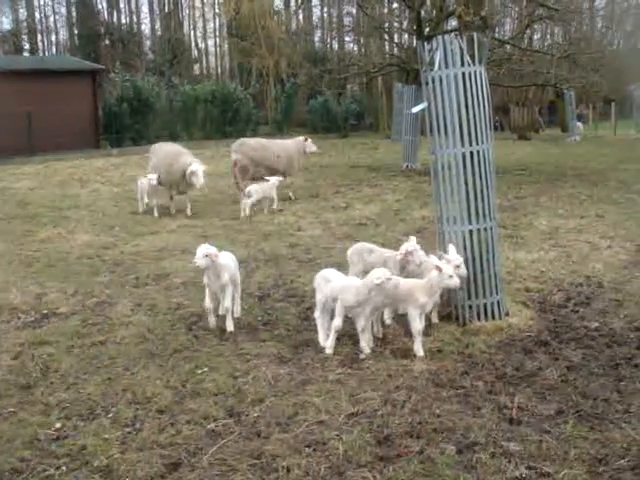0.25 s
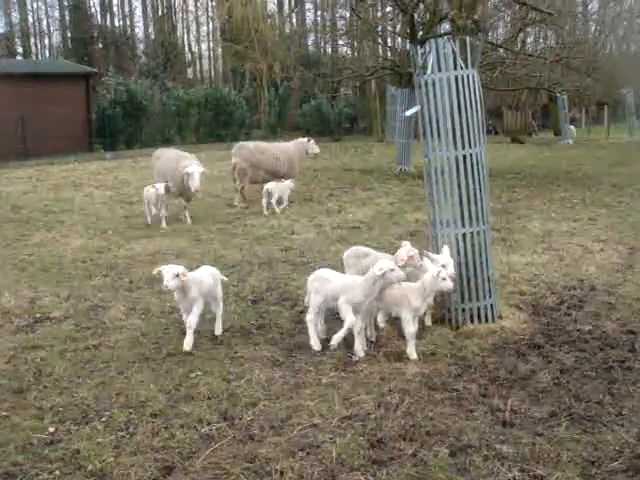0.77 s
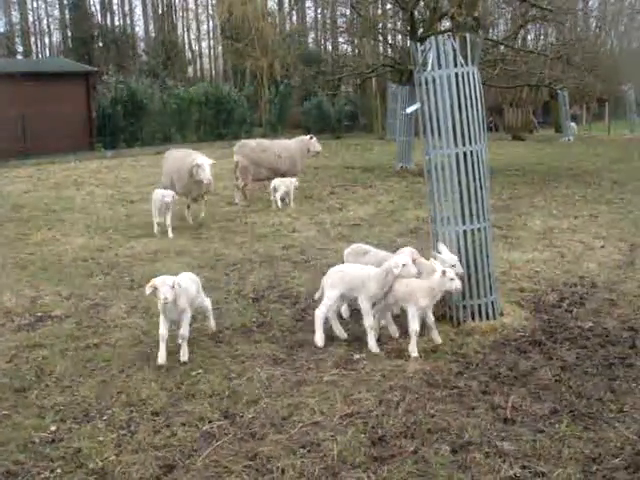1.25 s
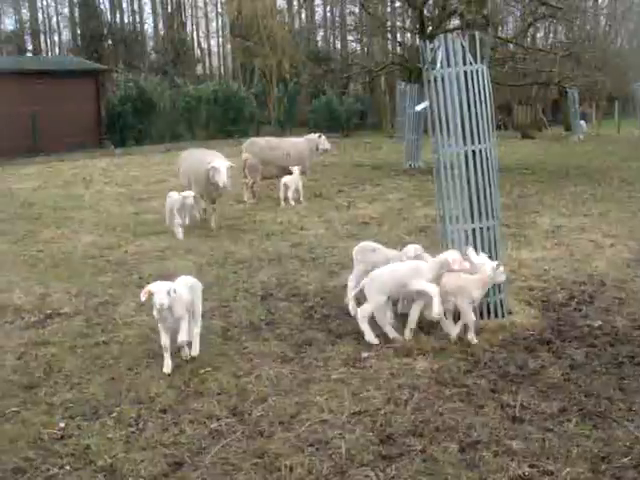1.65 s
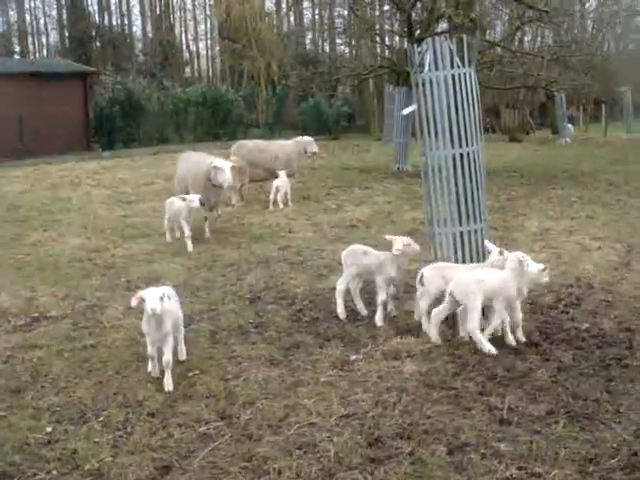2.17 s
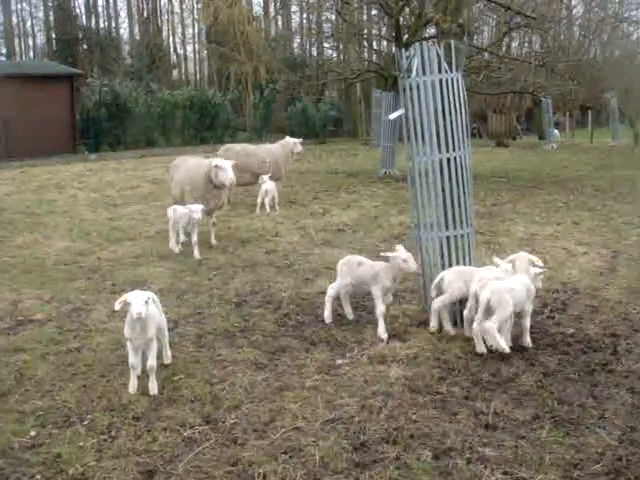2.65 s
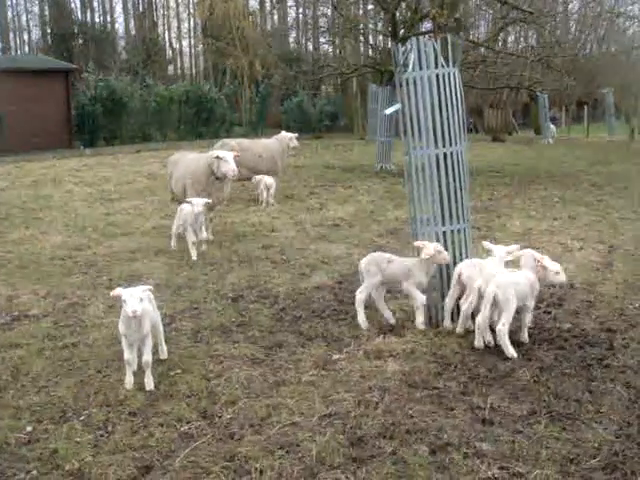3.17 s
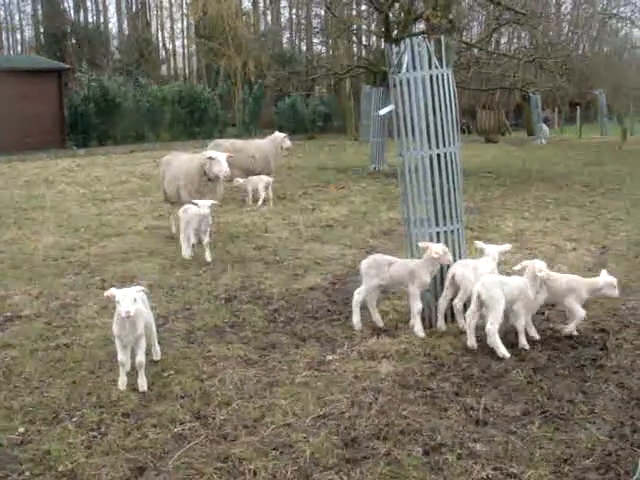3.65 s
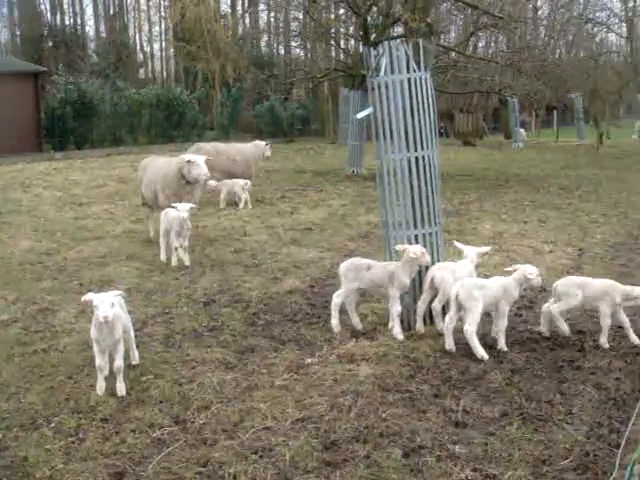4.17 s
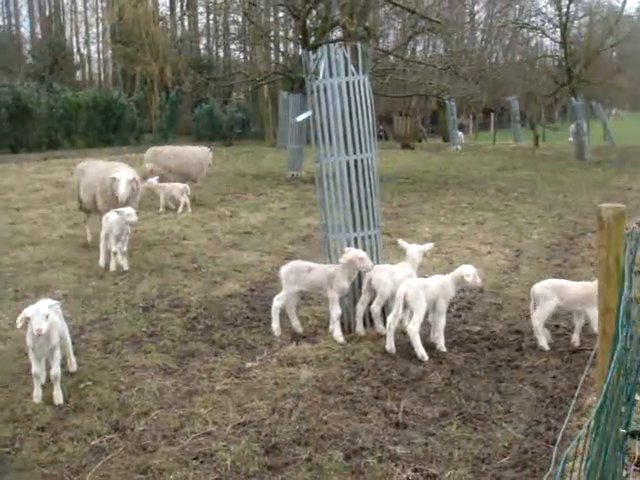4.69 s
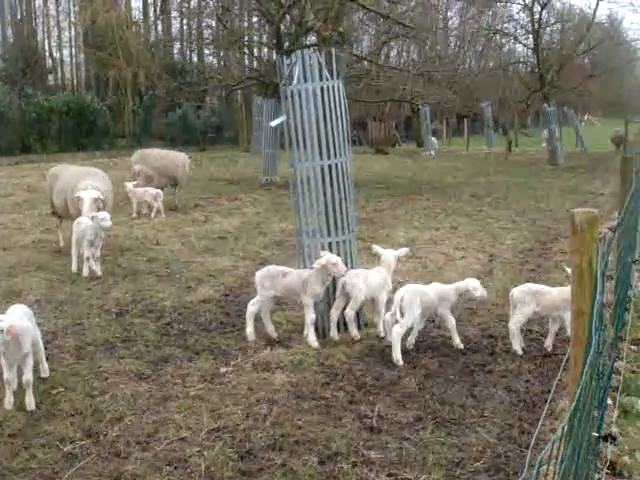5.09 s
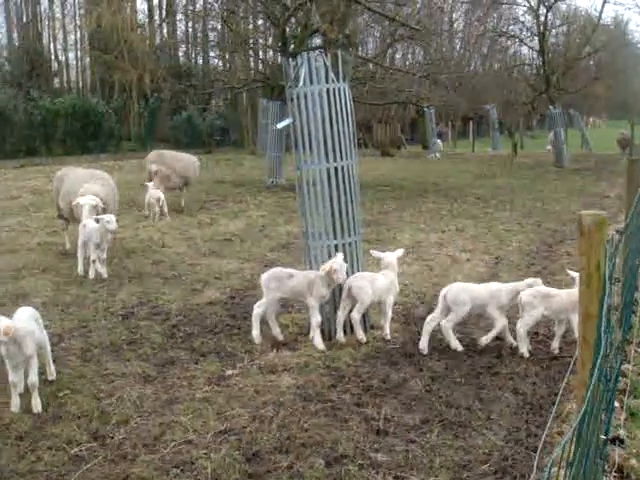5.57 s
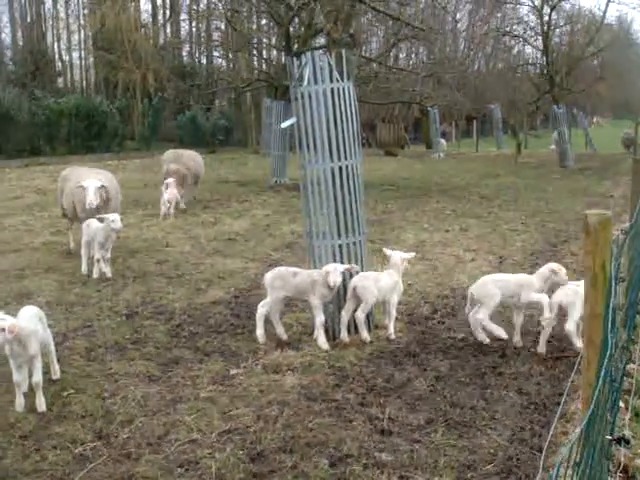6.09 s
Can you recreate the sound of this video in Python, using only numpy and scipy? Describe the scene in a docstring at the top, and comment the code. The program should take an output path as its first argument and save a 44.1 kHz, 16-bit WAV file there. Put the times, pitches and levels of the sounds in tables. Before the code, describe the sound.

A steady rush of distant traffic and a faint hiss fill an open paddock. Small birds twitter and whistle in the trees at the start, then chirp now and then. Lambs' hooves thud softly on turf and their legs faintly brush dry grass. Near the end an animal gives one short, gruff, bark-like call, much louder and closer than the background, which echoes off a shed and the tree line.

```python
"""Lambs' paddock with far traffic

Distant tyres merge into a steady rush under a faint hiss. Lambs' hooves thud softly on the turf and
their legs brush dry grass. Small birds tick, chirp and whistle in gliding sine notes, blurred by trees.
Near the end an animal gives one short, gruff, bark-like call: uneven vocal pulses and breath ring
its throat, and the sound comes back from shed, hedge and tree line."""
import sys
import numpy as np
from scipy import signal
from scipy.fft import rfft, irfft
from scipy.io import wavfile
from scipy.ndimage import uniform_filter1d

SR = 44100
rng = np.random.default_rng(int(sys.argv[2]) if len(sys.argv) > 2 else 0)


def wav_out(sig):
    """Save sig, one row per channel (or a flat mono array), as 16-bit PCM at SR to the path in sys.argv[1]."""
    wavfile.write(sys.argv[1], SR, np.round(np.clip(np.atleast_2d(sig).T, -1, 1) * 32767).astype(np.int16))


N = 279594
TIME = np.arange(N) / SR


def from_db(db):
    """Decibels to gain."""
    return 10 ** (np.asarray(db) / 20)


def rms_one(x):
    """Scale to unit power."""
    return x / np.sqrt(np.mean(x ** 2) + 1e-20)


def even(x):
    """Hold a signal at unit power from moment to moment."""
    return x / np.sqrt(np.abs(uniform_filter1d(x ** 2, SR // 50)) + 1e-12)


def colour(x, points):
    """EQ a signal along a curve of (frequency [Hz], gain [dB]) points."""
    hz, db = np.transpose(points)
    bins = np.maximum(np.fft.rfftfreq(len(x), 1 / SR), 1)
    return irfft(rfft(x) * from_db(np.interp(np.log(bins), np.log(hz), db)), len(x))


def band(x, low_hz, high_hz, order=2):
    """Butterworth band-pass."""
    return signal.sosfilt(signal.butter(order, [low_hz, high_hz], "band", fs=SR, output="sos"), x)


def resonate(x, hz, width_hz):
    """A resonance with gain 1 at its top."""
    r = np.exp(-np.pi * width_hz / SR)
    feedback = [1, -2 * r * np.cos(2 * np.pi * hz / SR), r * r]
    return signal.lfilter(np.array([1, 0, -1]) * (1 - r * r) / 2, feedback, x)


def drift(rate_hz):
    """Smooth random modulation of unit power, rolling off above rate_hz."""
    bins = np.fft.rfftfreq(N, 1 / SR)
    return rms_one(irfft(rfft(rng.standard_normal(N)) / (1 + (bins / rate_hz) ** 2) ** 2, N))


def swell(peak_s, rise, fall, hold_s=0):
    """An envelope in dB that climbs to 0, holds and falls again; slopes in dB per second."""
    attack_db = np.minimum(rise * (TIME - peak_s), 0)
    release_db = fall * np.maximum(TIME - peak_s - hold_s, 0)
    return np.maximum(attack_db - release_db, -120)


def tone(hz, db, waver):
    """A sine whose pitch wavers a little."""
    pitch_hz = hz * (1 + waver * drift(152.6))
    return np.sqrt(2) * from_db(db) * np.sin(2 * np.pi * np.cumsum(pitch_hz) / SR)


def traffic(rush_db=-41.5, ebb_db_per_s=0.1657, drone_db=-45):
    """Far tyres merge into a slowly ebbing rush; one vehicle's drone swells and recedes within it."""
    # spectrum of distant tyre noise: (frequency [Hz], gain [dB])
    tyre_eq = [(25, -33), (50, -32), (85, -16.5), (130, -20), (200, -11), (330, -13), (480, -6.5),
               (640, -2.5), (820, 1.5), (1050, -2.5), (1350, -11), (1800, -19), (2500, -29.5), (4000, -41)]
    rush = rms_one(colour(rng.standard_normal(N), tyre_eq))
    rush *= from_db(rush_db - ebb_db_per_s * TIME + 0.28 * drift(7.6))
    drone = rms_one(band(rng.standard_normal(N), 608, 770))
    return rush + drone * from_db(drone_db + swell(peak_s=3.02, rise=36, fall=6))


def hiss(level_db=-58, flicker_db=1.04):
    """A faint, slightly flickering hiss lies above the traffic."""
    # spectrum of the hiss: (frequency [Hz], gain [dB])
    hiss_eq = [(1500, -11), (2800, 2), (4200, 2), (6000, 1), (8000, 1.5), (10000, -2.5)]
    return rms_one(colour(rng.standard_normal(N), hiss_eq)) * from_db(level_db + flicker_db * drift(40))


def grass():
    """Dry stalks crackle briefly as legs brush through."""
    # leg strokes through the grass: (time [s], length [s], level [dB])
    rustles = [(1.398, 0.065, -61), (1.684, 0.036, -65.5), (2.026, 0.024, -56.5), (3.274, 0.03, -60),
               (3.697, 0.08, -63), (3.886, 0.062, -61)]
    strokes = sum(from_db(db) * np.exp(-(2 * (TIME - s) / length - 1) ** 2) for s, length, db in rustles)
    crackle = rng.standard_normal(N) * from_db(2 * drift(400))
    return strokes * rms_one(band(crackle, 2000, 9500))


def hooves(attack_s=0.0091):
    """Soft ground answers each step with a dull thud."""
    # hoof falls on turf: (time [s], level [dB], time to fall 60 dB [s])
    steps = [(1.26, -49.5, 0.25), (2.10, -54, 0.41), (2.17, -58, 0.39), (2.36, -53, 0.32)]
    envelope = np.zeros(N)
    for s, db, t60 in steps:
        age = np.maximum(TIME - s, 0)
        envelope += from_db(db - 60 * age / t60) * (1 - np.exp(-age / attack_s))
    return envelope * rms_one(band(rng.standard_normal(N), 55, 170))


def tree_line(x, wet_db, t60, build_s):
    """Trunks and twigs scatter the sound into a tail that builds up and dies away."""
    # colour of the scatter from the trees: (frequency [Hz], gain [dB])
    scatter_eq = [(200, -8), (400, -6), (700, -5), (1400, 9), (2200, -1.5), (3500, 1.5), (7500, 4.5)]
    age = TIME[:2 * SR]
    envelope = from_db(-60 * age / t60) * (1 - np.exp(-age / build_s))
    tail = colour(rng.standard_normal(len(age)), scatter_eq) * envelope
    return from_db(wet_db) * signal.fftconvolve(x, tail / np.sqrt(np.sum(tail ** 2)))[:N]


def echoes(x, dull_hz=900):
    """Shed and hedge throw back a few dull, separate echoes."""
    # reflections off shed and hedge: (delay [s], gain [dB])
    slaps = [(.064, -9.5), (.125, -41), (.172, -34), (.222, -25)]
    dull = band(x, 100, dull_hz, order=1)
    return sum(from_db(db) * np.interp(TIME - delay, TIME, dull, left=0) for delay, db in slaps)


def bird_notes(tick_s=.0075, tick_fall=0.24, upper_ratio=1.2):
    """The birdsong as notes of (time [s], length [s], start-middle-end pitch [Hz], level [dB])."""
    # a twitter of quick downward ticks: (time [s], middle pitch [Hz], level [dB])
    ticks = [(.0, 3360, -47), (.027, 4250, -48), (.047, 4500, -50), (.068, 4830, -53), (.087, 4640, -45.5),
             (.115, 3740, -37.5), (.148, 4280, -48), (.206, 4330, -50.5), (.236, 3730, -45.5),
             (.271, 3850, -45.5), (0.302, 3580, -48.5), (.398, 3420, -48.5)]
    for s, hz, db in ticks:
        yield s, tick_s, hz * (1 + tick_fall * np.array([.5, 0, -.5])), db
    # arched chirps: (time [s], length [s], top pitch [Hz], level [dB])
    chirps = [(0.698, .088, 3770, -51.5), (2.227, 0.092, 3720, -53), (3.722, 0.083, 3580, -52)]
    # a chirp's pitch curve: (start, middle, end) [shares of the top pitch]
    chirp_curve = [.9, 0.98, .74]
    for s, length, hz, db in chirps:
        arch = hz * np.array(chirp_curve)
        yield s, length, arch, db
        second_voice = upper_ratio * np.linspace(arch[1], arch[2], 3)
        yield s + length / 2, length / 2, second_voice, db - 10.5
    # thin, high "tsee" calls in two runs: (time [s], pitch [Hz], level [dB])
    tsees = [(0.413, 7300, -56.5), (.588, 7230, -54.5), (.742, 7100, -56.5), (.926, 7070, -58.5),
             (3.878, 7380, -60), (4.059, 7250, -59.5), (4.236, 7240, -61)]
    for s, hz, db in tsees:
        yield s, .026, hz * np.array([0.94, 1.045, 1.01]), db + 1.5   # an upward flick
        yield s + 0.032, 0.0736, hz * np.array([1.02, 0.98, .978]), db   # then a longer, sagging note
    # slurred whistles: (time [s], length [s], start [Hz], middle [Hz], end [Hz], level [dB])
    slurs = [(.44, .185, 3650, 3990, 3850, -53.5), (0.484, 0.17, 3540, 3380, 3327, -48),
             (.684, .02, 4970, 5350, 5350, -64), (1.532, .035, 8600, 8480, 8400, -63),
             (1.71, 0.067, 8600, 8300, 7550, -64.5), (3.705, 0.087, 5700, 6150, 6200, -67),
             (4.113, .065, 8900, 8750, 8550, -68), (4.296, 0.18, 8600, 7850, 7360, -64.5),
             (5.0, .25, 5380, 5450, 5450, -70.5)]
    for s, length, *pitches, db in slurs:
        yield s, length, pitches, db


def birds(waver=0.01, flutter_db=1.0):
    """Small birds whistle near-sine notes that glide along a curve and waver a little."""
    song = np.zeros(N)
    wobble = 1 + waver * drift(210)
    flutter = from_db(flutter_db * drift(70))
    for s, length, pitches, db in bird_notes():
        at = int(s * SR) + np.arange(int(length * SR))
        glide = np.polyfit([0, .5, 1], pitches, 2)
        hz = np.polyval(glide, np.linspace(0, 1, len(at))) * wobble[at]
        envelope = from_db(db) * signal.windows.tukey(len(at), .5)
        song[at] += envelope * np.sqrt(2) * np.sin(2 * np.pi * np.cumsum(hz) / SR)
    return song * flutter


def vocal_folds(phase, looseness, rasp=1.7):
    """Loose folds flap in uneven pulses and let a puff of air through in each cycle."""
    pulses = rms_one(sum(np.cos(k * phase) for k in range(1, 5)))
    pulses *= 1 + .5 * drift(220) + .5 * np.cos(phase / 2)   # strong and weak cycles take turns
    breath = rng.standard_normal(N) * (1 + .5 * np.cos(phase))
    return np.sqrt(looseness) * pulses + rasp * breath


def throat(source, mouth_db):
    """The throat rings at its formants; an open mouth lets out the upper ones."""
    # throat resonances: (frequency [Hz], width [Hz], relative level [dB])
    formants = [(395, 140, 0), (565, 130, -6), (740, 220, -9), (1240, 330, -7), (1540, 280, -12),
                (2120, 220, -15), (2600, 200, -25), (3180, 300, -28), (5550, 700, -28)]
    rings = [from_db(db) * even(resonate(resonate(source, hz, width), hz, width))
             for hz, width, db in formants]
    return rings[0] + from_db(mouth_db) * sum(rings[1:])


def gruff_call(start_s=5.412, peak_s=5.507, top_hz=469.6, jitter=.06):
    """One push of air: the rough voice locks into a clear hoot at its height, then breaks up again."""
    attack_s, hold_s, release_s, depth_db = 0.044, 0.081, 0.079, 26.5
    end_s = start_s + attack_s + hold_s + release_s
    past_peak_s = np.clip(TIME, start_s, end_s) - peak_s
    push_db = swell(start_s + attack_s, depth_db / attack_s, depth_db / release_s, hold_s)
    effort_db = swell(peak_s, rise=540, fall=381, hold_s=0.01094)
    voice_db, hoot_db = push_db - 30.5, effort_db - 18.5

    looseness = 1 / (1 + from_db(2 * (hoot_db - voice_db)))   # the pitch steadies while the hoot leads
    pitch_hz = (top_hz + 4 * effort_db) * (1 + jitter * looseness * drift(146))
    phase = 2 * np.pi * np.cumsum(pitch_hz) / SR
    mouth_db = 2 + 34 * past_peak_s + .12 * effort_db   # opens through the call, wider with effort
    voice = from_db(voice_db) * throat(vocal_folds(phase, looseness), mouth_db)
    hoot = np.sqrt(2) * from_db(hoot_db) * np.sin(phase)
    upper_tone = tone(hz=729.5, db=-33 + push_db + 30 * past_peak_s, waver=.045)

    # a thin whistle of air sets in at the peak and climbs
    whistle_db = -50 + swell(peak_s, rise=1000, fall=1000, hold_s=0.045)
    whistle = tone(hz=2550 + 2300 * past_peak_s, db=whistle_db, waver=0.0049)
    gate = uniform_filter1d(1.0 * ((TIME > start_s) & (TIME < end_s)), SR // 60)
    return (band(voice, 300, 6300, order=6) + hoot + upper_tone + whistle) * gate


def scene():
    """The paddock in mono, with its reflections; the birds sit among the trees."""
    call, song = gruff_call(), birds()
    near = call + echoes(call) + tree_line(call, wet_db=-5.5, t60=1.0, build_s=0.087)
    twigs = tree_line(song, wet_db=-5.0, t60=0.28, build_s=0.002)   # nearby branches blur each note
    far = song + twigs + tree_line(song, wet_db=-6.0, t60=0.69, build_s=0.025)
    return (near + far + hooves() + grass() + traffic() + hiss())[None]


def record(dry, cutoff_hz=10050):
    """A steep low-pass takes off the top."""
    return signal.sosfilt(signal.ellip(12, .1, 80, cutoff_hz, fs=SR, output="sos"), dry)


dry = scene()
out = record(dry)
wav_out(out)
```